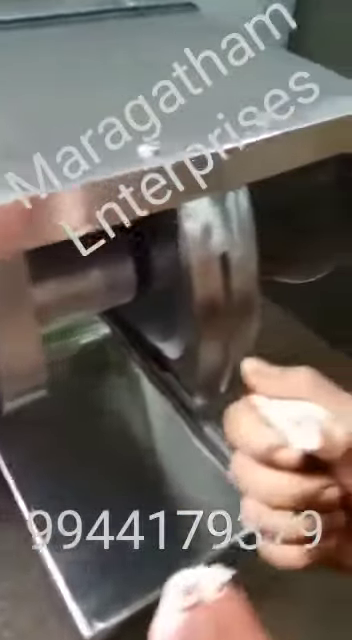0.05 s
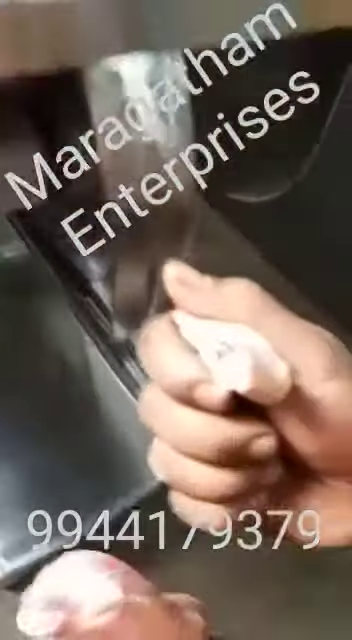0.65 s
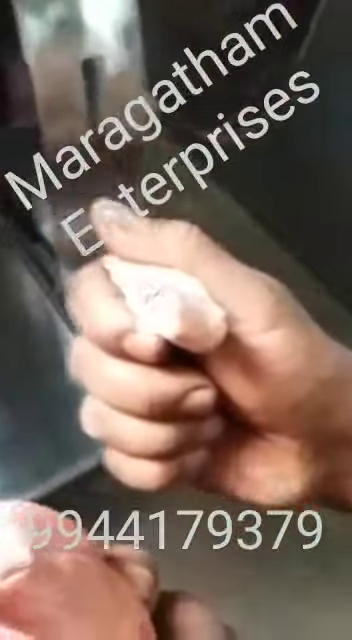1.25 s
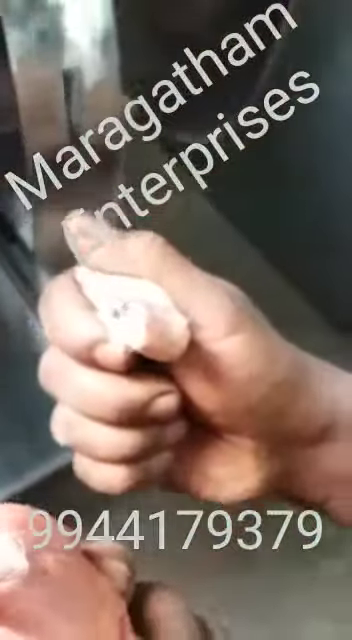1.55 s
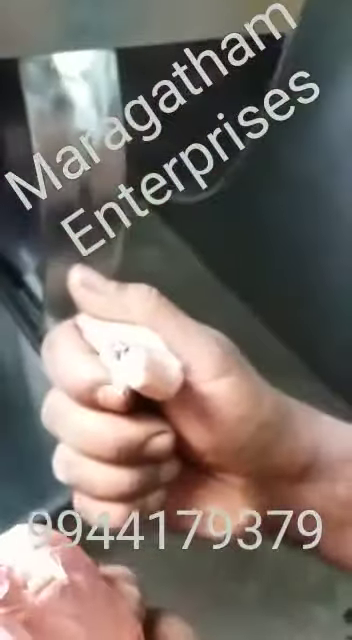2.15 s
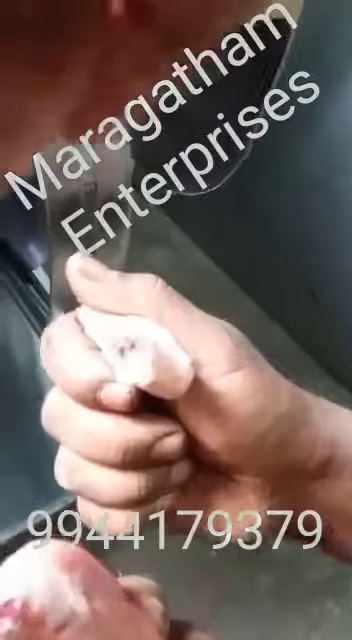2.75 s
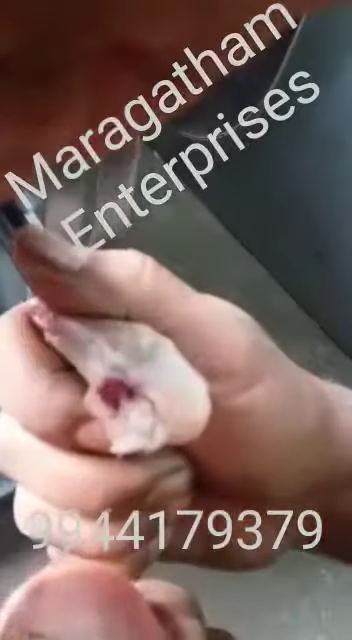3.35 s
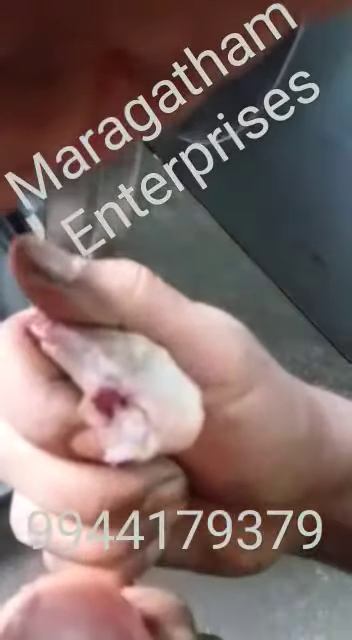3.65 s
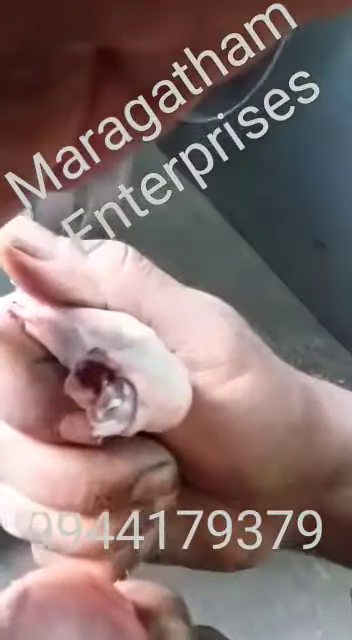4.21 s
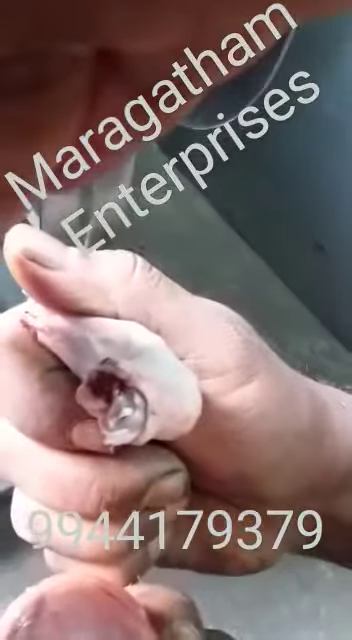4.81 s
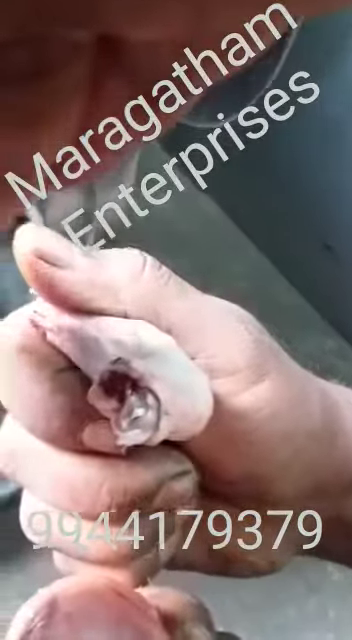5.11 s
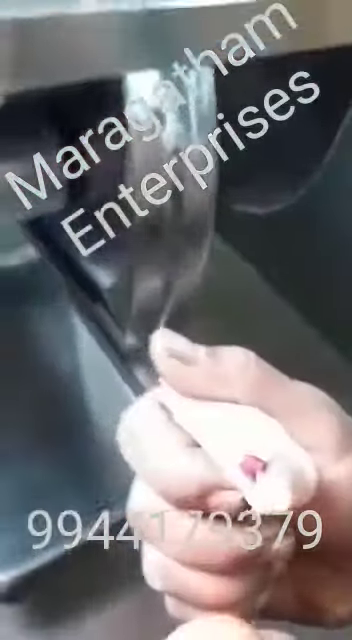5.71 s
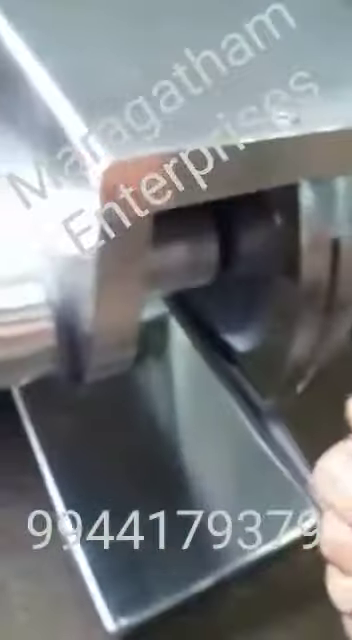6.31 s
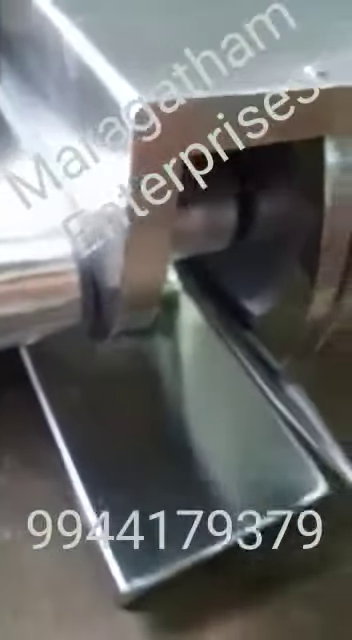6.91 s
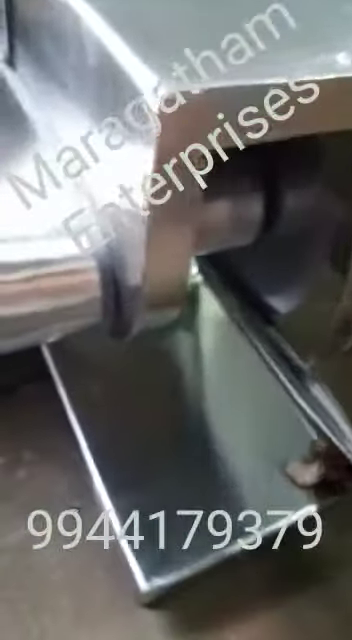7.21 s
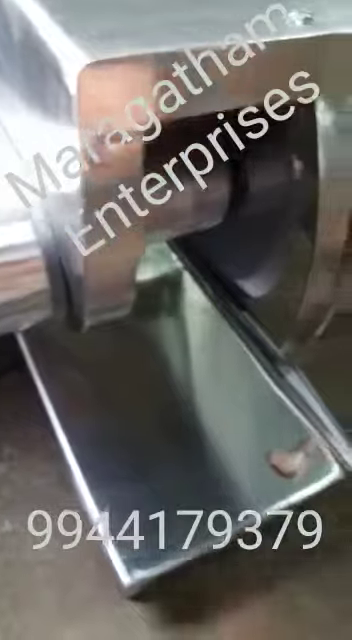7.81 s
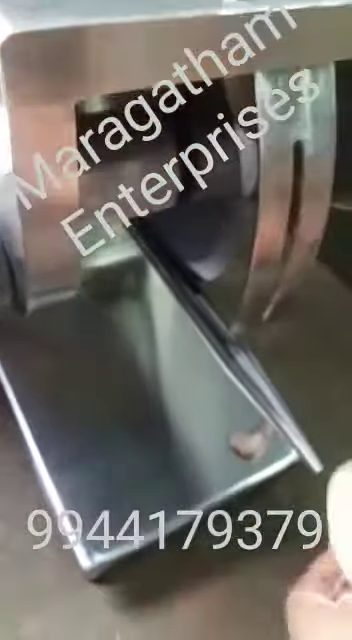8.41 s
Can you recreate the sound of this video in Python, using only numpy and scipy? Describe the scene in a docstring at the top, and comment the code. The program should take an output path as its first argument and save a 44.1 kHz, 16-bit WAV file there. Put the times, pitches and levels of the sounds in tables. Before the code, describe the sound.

A belt-driven cutting machine runs with a low pulsing motor hum and light whirr, its disc blade spinning freely.

```python
"""A belt-driven meat cutter idles indoors, its disc blade spinning free.
The motor hums at twice the mains rate and throbs with each belt turn; the steel frame drones.
Motor and bearings whine, the shafts whirr, a blade-shaft bearing ticks and rasps, the disc hisses.
The belt slips with four chirps. The phone that hears it all is bumped softly as it moves,
and the housing shades the upper sounds as it dips beside the machine."""
import sys
import numpy as np
from scipy import signal
from scipy.fft import rfft, irfft, next_fast_len
from scipy.io import wavfile
from scipy.ndimage import map_coordinates

SR = 44100
rng = np.random.default_rng(int(sys.argv[2]) if len(sys.argv) > 2 else 0)


def put_to_file(sound):
    """Save the sound as 16-bit audio at rate SR, in the file named by the first command-line argument."""
    columns = np.atleast_2d(sound).T  # one column per channel
    safe = np.clip(columns, -1, 1)
    whole_steps = np.round(safe * 32767)
    wavfile.write(sys.argv[1], SR, whole_steps.astype(np.int16))


N = 381903
T = np.arange(N) / SR

HUM_HZ, BELT_HZ, SHAFT_HZ, BEARING_HZ = 99.93, 8.41, 12.49, 43.74
MAINS_HZ, MOTOR_HZ = HUM_HZ / 2, 2 * SHAFT_HZ


def undb(db):
    """Decibels to gain."""
    return 10 ** (np.asarray(db) / 20)


def unit(x):
    """Scale to rms 1."""
    return x / np.sqrt(np.mean(x ** 2))


def colour(x, spectrum):
    """Minimum-phase filter through (f/Hz, level/dB) points; output rms 1."""
    hz, db = np.transpose(spectrum)
    size = next_fast_len(N + 8192, real=True)
    bins_hz = np.maximum(np.fft.rfftfreq(size, 1 / SR), 1)
    gain = undb(np.interp(np.log(bins_hz), np.log(hz), db))
    cepstrum = irfft(np.log(gain), size)
    cepstrum[1:size // 2] *= 2
    cepstrum[size // 2 + 1:] = 0
    return unit(irfft(rfft(x, size) * np.exp(rfft(cepstrum)), size)[:N])


def walk(rate_hz):
    """Smooth random drift, spread near 1."""
    knots = rng.standard_normal(1024)
    coarse_s = T[::256]
    return np.interp(T, coarse_s, map_coordinates(knots, [coarse_s * rate_hz], order=3, mode="wrap"))


def flanked(hz, db, lower_db, upper_db, rate_hz):
    """A line and the two sidebands from a turning part, as (f/Hz, level/dB)."""
    return [(hz - rate_hz, lower_db), (hz, db), (hz + rate_hz, upper_db)]


def tones(lines, waver_db, wobble_rad, drift_hz):
    """Machine lines drifting in level and phase."""
    out = 0
    for hz, db in lines:
        phase = 2 * np.pi * hz * T + rng.uniform(0, 2 * np.pi) + wobble_rad * walk(drift_hz)
        out = out + undb(db + waver_db * walk(drift_hz)) * np.cos(phase)
    return np.sqrt(2) * out


def clatter(turn_hz, repeat):
    """Dense small knocks; the share `repeat` of their power recurs every turn."""
    one_turn = rng.standard_normal(int(SR / turn_hz))
    return np.sqrt(repeat) * np.resize(one_turn, N) + np.sqrt(1 - repeat) * rng.standard_normal(N)


def steel_echoes(x, span_s, sway_s, gain, count=5):
    """Reflections off steel panels; the paths shift as the phone moves. Output rms 1."""
    out = x
    for k in range(count):
        lag_s = span_s * (k + rng.uniform(.4, 1)) / count + sway_s * walk(.6)
        out = out + gain * (-1) ** k * np.interp(T - lag_s, T, x)
    return unit(out)


# Housing shadow: f/Hz, loss in full shade/dB, exponent (above 1: sound bends round the edge at first)
SHADOW_BANDS = [(100, 0.6, 1.5), (201, 2.5, 2.5), (400, 7.5, 1.8), (730, 9, 2.3), (1280, 17, 1.08),
                (1780, 11, 1.5), (3000, 10, 1.6), (6000, 10, .8), (11000, 11, 0.54)]
def shaded(x, view_db):
    """The housing blocks treble more than bass: no loss at the highest view_db, full at the lowest."""
    shade = (view_db.max() - view_db) / np.ptp(view_db)
    size = next_fast_len(N, real=True)
    spectrum = rfft(x, size)
    log_hz = np.log(np.fft.rfftfreq(size, 1 / SR) + 1)
    log_centres = np.log([row[0] for row in SHADOW_BANDS])
    out = 0
    for weights, (_, loss_db, exponent) in zip(np.eye(len(SHADOW_BANDS)), SHADOW_BANDS):
        band = irfft(spectrum * np.interp(log_hz, log_centres, weights), size)[:N]
        out = out + band * undb(-loss_db * shade ** exponent)
    return out


def blip(t, width_s):
    """Gaussian envelope centred on t = 0."""
    return np.exp(-.5 * (t / width_s) ** 2)


# Bumps on the phone: t/s, envelope peak/dB
HANDLING_BUMPS = [(.37, -33), (1.749, -36), (2.28, -32.5), (2.44, -30), (2.89, -27)]
def bumps(pitch_hz=66, width_s=.011):
    """Dull thuds of a cycle or two through the phone's case."""
    return sum(undb(db) * blip(T - s, width_s) * np.sin(2 * np.pi * pitch_hz * (T - s))
               for s, db in HANDLING_BUMPS)


# Belt slips: t/s, envelope peak/dB, centre f/Hz
BELT_SLIPS = [(4.632, -29, 730), (4.744, -25.5, 750), (4.865, -25.5, 750), (4.984, -33, 814)]
def belt_chirps(width_s=.004, fall_per_s=25):
    """Short falling squeaks of rubber on the pulley."""
    out = 0
    for s, db, hz in BELT_SLIPS:
        t = T - s
        phase = 2 * np.pi * hz * (t - fall_per_s * t ** 2 / 2)
        out = out + undb(db) * blip(t, width_s) * np.sin(phase)
    return out


# Disc noise spectrum: f/Hz, relative level/dB
DISC_SPECTRUM = [(2000, -32.5), (4900, -16), (6000, -3), (7000, -6.5), (8100, -2.5), (8900, -6), (9700, 2),
                 (10700, -2.5), (11700, 2), (13000, -3), (14800, -1.5), (15600, -5)]
def disc_hiss():
    """The free-spinning blade hisses; nearby steel reflects it."""
    hiss = colour(rng.standard_normal(N), DISC_SPECTRUM)
    return steel_echoes(hiss, span_s=.003, sway_s=3e-5, gain=.2)


def ball_passes(load_db=3.5, scatter_db=.7, decay_s=.0016, tail_s=.0036, tail_db=-14):
    """Contact force of each ball rolling over a flaw, stronger under the shaft's heavy side."""
    passes = (T + .0005) * BEARING_HZ
    ball = passes.astype(int)
    age_s = passes % 1 / BEARING_HZ
    load = np.cos(2 * np.pi * SHAFT_HZ * (T - .052))
    strength = undb(load_db * load + scatter_db * rng.standard_normal(ball[-1] + 1)[ball])
    return unit(strength * (np.exp(-age_s / decay_s) + undb(tail_db) * np.exp(-age_s / tail_s)))


def grit(force, spectrum, rolling):
    """Grit in the race, crushed by passing balls over a steady rolling contact."""
    return colour(np.sign(rng.standard_normal(N)) * np.hypot(force, rolling), spectrum)


# Bearing tick and rasp spectra: f/Hz, relative level/dB
TICK_SPECTRUM = [(1500, -28.5), (3300, -3), (3800, -14), (4400, -14), (5000, -21.5), (5600, -4.5),
                 (6200, -4), (6900, -25), (8000, -13.5), (9800, -5.5), (10600, -13.5), (15500, -18)]
RASP_SPECTRUM = [(1200, -40.5), (2800, -6.5), (3300, 2), (3800, -2), (4400, 2), (5000, -6), (6000, -1.5),
                 (6450, -4), (6900, -22.5), (12000, -35.5)]
def bearing(view_db, tick_db=-60, rasp_db=-58.5):
    """Ticks and rasp beam from the open side; out of view the rasp fades more than the ticks."""
    force = ball_passes()
    ticks = steel_echoes(grit(force, TICK_SPECTRUM, rolling=.28), span_s=.0016, sway_s=3e-5, gain=.26)
    rasp = steel_echoes(grit(force, RASP_SPECTRUM, rolling=1.2), span_s=.004, sway_s=5e-5, gain=.3)
    beam_db = view_db - view_db.max()
    return ticks * undb(tick_db + .95 * beam_db) + rasp * undb(rasp_db + 1.34 * beam_db)


# Motor and bearing lines: f/Hz, relative level/dB, each sideband/dB, modulation f/Hz
WHINE_LINES = [(354.9, -52, -61, MOTOR_HZ), (474.9, -51, -57, MAINS_HZ), (565.3, -56, -67, MOTOR_HZ),
               (574.9, -61, -64, MOTOR_HZ), (811.4, -54, -60.5, MOTOR_HZ), (911.4, -63, -66, MAINS_HZ),
               (981.9, -57, -68, BEARING_HZ), (1106.4, -62, -66, BEARING_HZ),
               (1237.7, -54.5, -57.5, BEARING_HZ), (1432.5, -66, -64.5, BEARING_HZ),
               (1526.1, -60, -70, MOTOR_HZ), (1627.8, -64, -73, MOTOR_HZ), (1909.9, -66.5, -71, BEARING_HZ)]
def whine():
    """Thin tones of motor and bearings, modulated by mains, rotor or passing balls."""
    lines = [line for hz, db, side_db, rate_hz in WHINE_LINES
             for line in flanked(hz, db, side_db, side_db, rate_hz)]
    return tones(lines, waver_db=3.5, wobble_rad=.55, drift_hz=1.605)


# Housing modes: f/Hz, width/Hz, level/dB re the whirr
HOUSING_MODES = [(478.7, 5.6, -10.5), (814.7, 15, -18.5), (1227, 53, -12), (1632, 17, -23.5),
                 (1892, 30, -24), (2120, 26, -28), (2433, 40, -29.5), (2650, 170, -27), (2780, 54, -35),
                 (3130, 130, -36)]
def housing_ring():
    """Steel panels ring in narrow bands under the rolling noise."""
    hz = np.fft.rfftfreq(N, 1 / SR) + 1
    response = 0
    for mode_hz, width_hz, db in HOUSING_MODES:
        detuning = (hz - mode_hz ** 2 / hz) / width_hz
        response = response + undb(db) / np.sqrt(width_hz) / (1 + 1j * detuning) ** 2
    rms = np.sqrt(sum(undb(db) ** 2 for _, _, db in HOUSING_MODES))
    knocks = clatter(SHAFT_HZ, repeat=.059)
    return rms * unit(irfft(rfft(knocks) * response, N))


# Rolling noise spectrum: f/Hz, relative level/dB
WHIRR_SPECTRUM = [(200, -18), (350, 3.5), (445, -5), (480, 5.5), (540, -2.5), (760, -1), (1040, -6),
                  (1230, -3.5), (1350, -7), (1850, -13), (2300, -22), (3000, -27.5), (4500, -40.5),
                  (9000, -76)]
def shaft_whirr(buzz_db=1):
    """Rolling noise of the shafts, pulsed slightly by motor torque."""
    torque = undb(buzz_db * np.cos(2 * np.pi * HUM_HZ * T))
    return colour(clatter(SHAFT_HZ, repeat=.14) * torque, WHIRR_SPECTRUM)


# Base vibration spectrum: f/Hz, relative level/dB
BASE_SPECTRUM = [(25, -44), (42, -39), (62, -10.5), (100, -10.5), (135, -10), (160, -7), (212, -0.5),
                 (248, -2.5), (285, -2), (345, -8), (440, -19.5), (700, -38.5), (3000, -100)]
def base_rumble(belt_rad, throb_db=1.5):
    """The belt shakes the sheet-steel base, hardest as its stiff spot rounds the pulley."""
    throb = undb(-throb_db * np.cos(belt_rad))
    return colour(clatter(BELT_HZ, repeat=.49) * throb, BASE_SPECTRUM)


# Frame lines: f/Hz, relative level/dB, lower and upper belt sideband/dB
FRAME_LINES = [(74.6, -45, -60, -60), (130.9, -42, -56, -56), (134.0, -41, -43, -45),
               (135.6, -39, -35, -38), (167.4, -41, -48, -46), (183.0, -43, -44, -42),
               (187.3, -41, -56, -46), (210.1, -34, -35, -42), (211.7, -36, -46, -35),
               (217.1, -39, -44, -44), (226.6, -40, -50, -49), (282.7, -45, -52, -51),
               (313.6, -46, -56, -56)]
def frame_drone():
    """The steel frame drones, shaken by motor and pulleys and tugged by the belt."""
    lines = [line for row in FRAME_LINES for line in flanked(*row, BELT_HZ)]
    return tones(lines, waver_db=1.5, wobble_rad=.35, drift_hz=1.525)


# Magnetic hum: harmonic number, relative level/dB, lower and upper belt sideband/dB
HUM_PARTIALS = [(1, -20.5, -47, -39), (2, -22, -39, -29), (3, -41, -51.5, -54), (4, -46, -55, -62.5),
                (5, -45.5, -51, -53.5)]
def motor_hum(belt_rad, slip_hz=.81, waver_db=2):
    """Magnetic pull on the stator, beating with rotor slip; the belt's load adds sidebands."""
    slip = np.cos(2 * np.pi * slip_hz * (T - .1))
    phase = 2 * np.pi * HUM_HZ * T + .14 * walk(1.89)
    out = 0
    for harmonic, db, lower_db, upper_db in HUM_PARTIALS:
        carrier = harmonic * phase + rng.uniform(0, 2 * np.pi)
        lower = undb(lower_db) * np.cos(carrier - belt_rad)
        upper = undb(upper_db) * np.cos(carrier + belt_rad)
        beat_db = (.5 if harmonic == 1 else -.92) * slip  # overtones swing against the fundamental
        drift_db = waver_db * (harmonic > 2) * walk(3)
        out = out + (undb(db) * np.cos(carrier) + lower + upper) * undb(beat_db + drift_db)
    return np.sqrt(2) * out


# Exposure along the phone's path: t/s, machine view/dB, bearing view/dB (both rescaled in use)
PHONE_PATH = [(0.12, -42, -70), (1.16, -45, -66.5), (1.35, -43, -68), (1.76, -52.5, -74.5),
              (1.99, -54.5, -77), (2.87, -49.5, -76), (5.07, -45, -71.5), (5.51, -41.5, -67.5),
              (6.27, -41.5, -64.5), (7.17, -40.5, -62.5), (8.42, -39.5, -62)]
def scene():
    """The cutter runs steadily while the phone dips behind the housing and comes back."""
    path_s, *views_db = np.transpose(PHONE_PATH)
    machine_view_db, bearing_view_db = (np.interp(T, path_s, db) for db in views_db)
    belt_rad = 2 * np.pi * BELT_HZ * (T - .012) + .15 * walk(2)
    hum = motor_hum(belt_rad) * undb(.46)
    rumble = base_rumble(belt_rad) * undb(-31.5)
    drone = frame_drone() * undb(1.16)
    rolling = (shaft_whirr() + housing_ring()) * undb(-37 + .73 * np.cos(belt_rad))
    hiss = disc_hiss() * undb(-56)
    ticks_and_rasp = bearing(bearing_view_db)
    machine = hum + rumble + drone + rolling + hiss + whine() * undb(3)
    return (shaded(machine, machine_view_db) + ticks_and_rasp + belt_chirps() + bumps())[None]


def record(dry):
    """Steep low-pass at 15.5 kHz."""
    return signal.sosfilt(signal.ellip(10, .2, 80, 15500, fs=SR, output="sos"), dry)


dry = scene()
out = record(dry)
put_to_file(out)
```